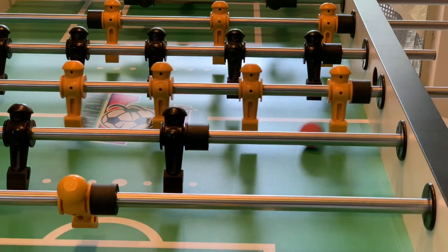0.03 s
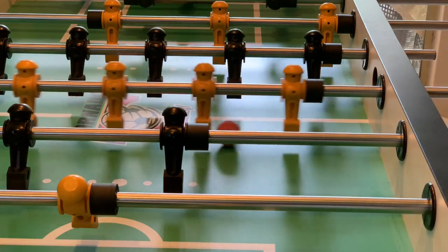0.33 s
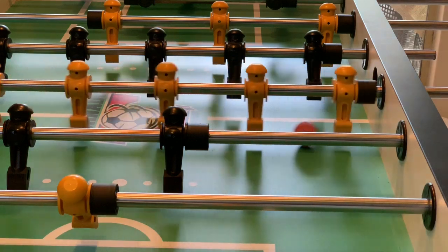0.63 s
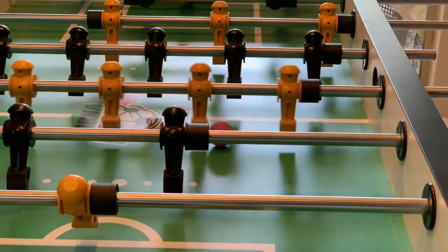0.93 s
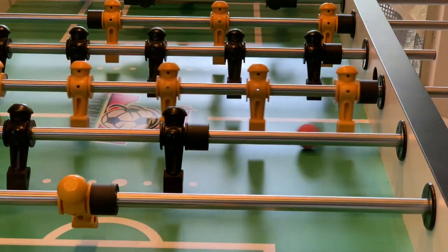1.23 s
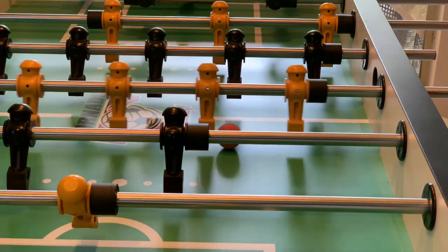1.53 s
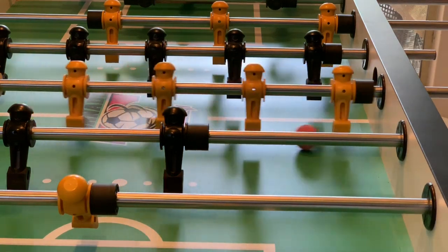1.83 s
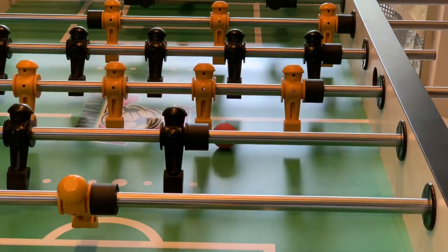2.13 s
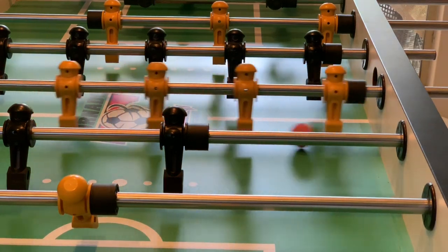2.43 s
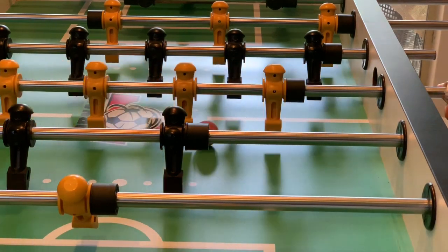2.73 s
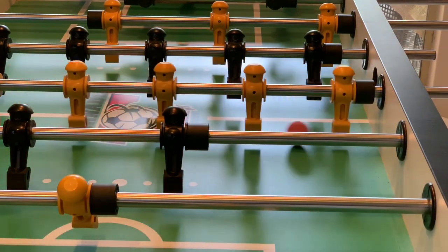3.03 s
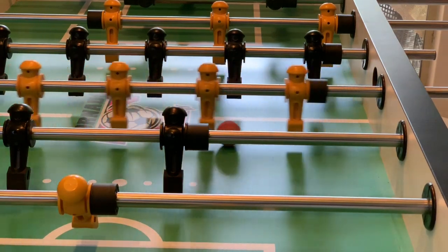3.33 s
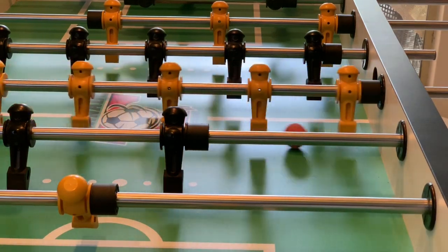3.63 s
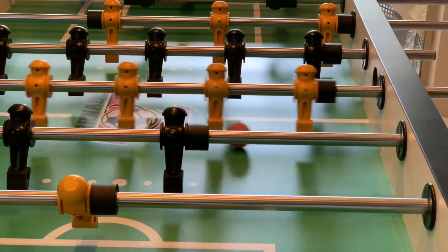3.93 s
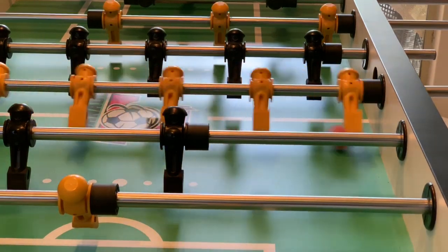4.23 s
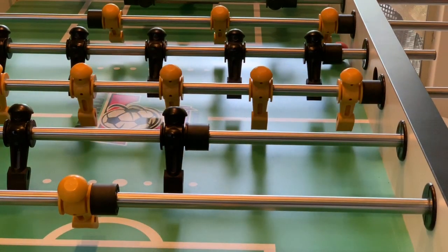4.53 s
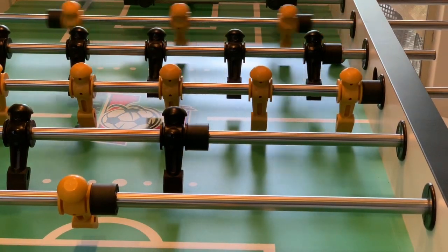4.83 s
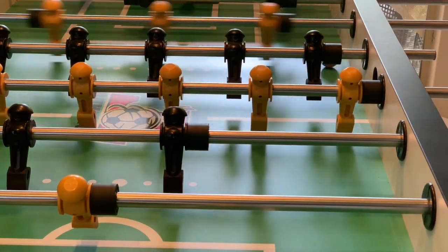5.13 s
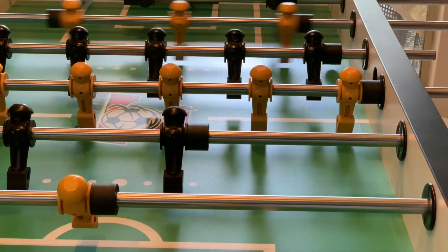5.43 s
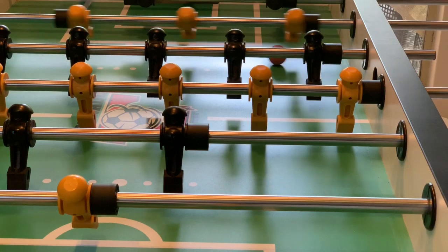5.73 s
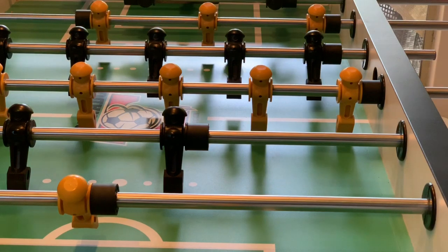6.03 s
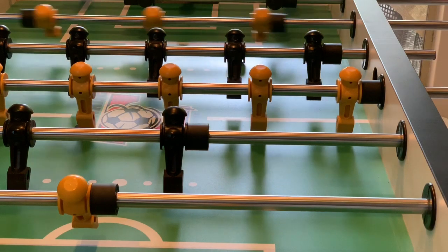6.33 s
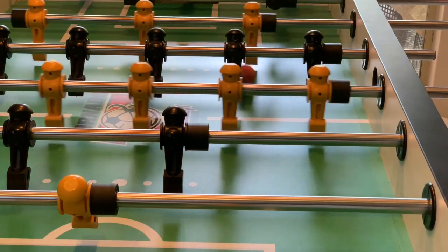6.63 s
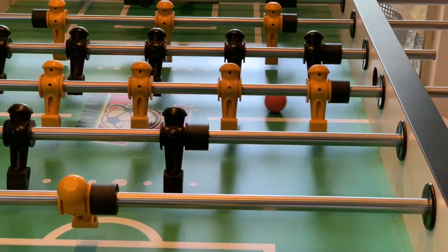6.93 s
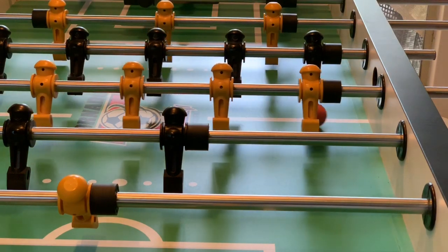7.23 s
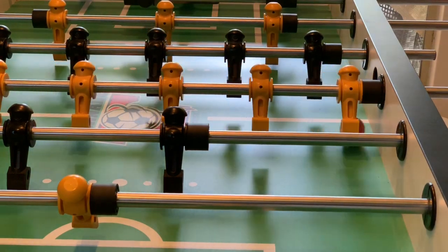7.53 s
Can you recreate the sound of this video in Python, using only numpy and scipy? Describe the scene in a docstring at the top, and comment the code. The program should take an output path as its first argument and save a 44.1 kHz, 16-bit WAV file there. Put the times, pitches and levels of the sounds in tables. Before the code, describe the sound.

A foosball table is heard from one end, in a quiet room with faint low background noise. For the first four seconds, plastic men tap the ball to and fro, seven light clicks about 0.6 seconds apart. After each, the ball hops, rolls with a soft rumble and is stopped with a small clunk, while a steel rod hisses back through its bearings. A dull thump comes near 2.5 seconds. At 4.3 seconds a hard shot booms through the cabinet, followed by sharp rebounds, with a loud knock at 4.5. Another crack comes at 5.1 and a cluster of knocks around 5.5. Quieter bounces, rod scrapes and clunks continue until a firmer knock and some rolling near 6.9 seconds. At about 7.6 seconds a last stroke gives a low thump with clicks and a clunk, and the ball rolls on.

```python
"""Table football in a quiet room.

Heard from one end of the table, two plastic men tap the ball to and fro; it hops and rolls, ringing the
playfield. Then come a shot, a rebound and bounces off the walls. The steel rods slide and clunk in
their bearings, and hard strokes make the cabinet boom."""
import sys
import numpy as np
from scipy import signal
from scipy.fft import rfft, irfft
from scipy.io import wavfile

SR = 44100
rng = np.random.default_rng(int(sys.argv[2]) if len(sys.argv) > 2 else 0)


def wav_out(sig):
    """Save sig, one row per channel (or a flat mono array), as 16-bit PCM at SR to the path in sys.argv[1]."""
    wavfile.write(sys.argv[1], SR, np.round(np.clip(np.atleast_2d(sig).T, -1, 1) * 32767).astype(np.int16))


N = 343539
SIZE = 24000  # samples per response
AGE_S = np.arange(SIZE) / SR
FREQ_HZ = np.maximum(np.arange(SIZE // 2 + 1) * SR / SIZE, 1)
ROOM_T60_S = 0.36

# a man taps the ball across: t/s, level/dB, flight/s, hiss of the rod's return/dB
TAPS = [(.178, -35, .030, -59), (.796, -33.5, 0.042, -57.5), (1.3991, -36, 0.034, -69.5),
        (1.992, -34.5, 0.033, -53.5), (2.538, -31.5, .035, -63), (3.210, -36, 0.028, -56),
        (3.837, -37.5, 0.026, -57)]
# the loose ball hits playfield or wall: t/s, level/dB, contact/ms, first hop/s
KNOCKS = [(2.497, -35, 0.52, 0), (4.379, -16, 0.56, 0), (4.392, -21.5, 1.7, .028), (4.448, -25, 0.82, 0),
          (4.499, -24.5, 0.55, 0), (4.518, -10.5, 0.44, 0), (5.1145, -23, 0.34, 0), (5.124, -16, 0.49, 0),
          (5.531, -23.5, 0.49, 0.0058), (5.596, -19.5, 0.56, 0), (5.642, -22, 0.78, .030),
          (5.930, -44, 0.93, 0), (6.009, -42.5, 1.12, 0.04), (6.157, -51.5, 1.25, 0), (6.189, -49, 1, 0),
          (6.250, -34.5, 0.89, 0), (6.430, -34.5, 1.93, 0), (6.566, -35.5, 1.12, 0),
          (6.858, -26, 0.83, 0.00071), (6.871, -21, 2.1, 0.0018)]
# a rod clunks in its bearings: t/s, level/dB, contact/ms
CLUNKS = [(2.448, -34.5, 0.1), (2.689, -35, 0.65), (4.939, -39.5, .11), (5.240, -37.5, .27),
          (5.454, -34.5, 0.16), (5.834, -36.5, 0.089), (6.232, -32, 0.24), (6.411, -39, 0.099),
          (6.502, -40, 0.074), (6.8576, -32.5, 0.19), (7.675, -33, .43)]
# stereo width of scattered sound: f/Hz, side over mid/dB
WIDTH = [(60, -24), (150, -18), (350, -11.5), (700, -5), (1400, -1), (4000, -0.5), (14000, -0.5)]


def from_db(db):
    """Decibels to gain."""
    return 10 ** (np.asarray(db) / 20)


def unit_energy(x):
    """Scale to a mean energy of one per channel."""
    return x / np.sqrt(np.mean(np.sum(x ** 2, axis=-1)))


def dying(t60_s, rise_s):
    """Envelope that swells, then falls 60 dB in t60_s."""
    return (1 - np.exp(-AGE_S / rise_s)) * np.exp(-np.log(1000) * AGE_S / t60_s)


def partials(modes, rise_s):
    """Sum of dying sines."""
    return sum(from_db(db) * np.sin(2 * np.pi * hz * AGE_S) * dying(t60_s, rise_s)
               for hz, db, t60_s in modes)


def gains(points):
    """Gain per bin from (f/Hz, level/dB) points."""
    hz, db = np.transpose(points)
    return from_db(np.interp(np.log(FREQ_HZ), np.log(hz), db))


def colour(points):
    """Minimum-phase response through (f/Hz, level/dB) points."""
    cepstrum = irfft(np.log(gains(points)))
    causal_fold = 1 + np.sign(SIZE / 2 - np.arange(SIZE)) * (AGE_S > 0)
    return np.exp(rfft(cepstrum * causal_fold))


def resonances(modes):
    """Ringing peaks on a flat response."""
    return 1 + sum(from_db(db) / (1 + 1j * (FREQ_HZ ** 2 - hz ** 2) / (FREQ_HZ * width_hz))
                   for hz, width_hz, db in modes)


def contact(ms, order):
    """Low-pass: a longer contact excites fewer highs."""
    corner_hz = min(1000 / max(ms, .06), .45 * SR)
    return signal.freqs(*signal.butter(order, 1, analog=True), FREQ_HZ / corner_hz)[1]


def scatter(t60_s, rise_s):
    """Stereo response of dense reflections."""
    mid, side = rfft(unit_energy(rng.standard_normal((2, SIZE)) * dying(t60_s, rise_s)))
    return mid + side * gains(WIDTH) * [[1], [-1]]


def reflections(blows, t60_s, rise_s, shared=.55):
    """One response per blow: the walls stay put, only the struck spot moves."""
    common = np.sqrt(shared) * scatter(t60_s, rise_s)
    return [common + np.sqrt(1 - shared) * scatter(t60_s, rise_s) for _ in blows]


def add(track, s, db, sound):
    """Mix in at time s, tail faded; db is the level if all the energy fell within 20 ms."""
    start = round(s * SR)
    fade = np.minimum(1, 4 * (1 - np.arange(SIZE) / SIZE))
    scaled = from_db(db) * np.sqrt(.02 * SR) * unit_energy(sound) * fade
    track[:, start:start + SIZE] += scaled[..., :N - start]


def steady(response, drive):
    """Two unrelated drives through a unit-energy response, as mid and side."""
    impulse = irfft(response)
    side_impulse = irfft(response * colour(WIDTH)) / np.linalg.norm(impulse)
    mid = signal.oaconvolve(drive[0], unit_energy(impulse))[:N]
    side = signal.oaconvolve(drive[1], side_impulse)[:N]
    return mid + side * [[1], [-1]]


def hops(s, db, ms, gap_s, loss_db, restitution=.6, shortest_s=.025):
    """Ever shorter, weaker bounces: t/s, level/dB, contact/ms."""
    contacts = [(s, db, ms)]
    while gap_s > shortest_s:
        s, db = s + gap_s, db - loss_db
        contacts.append((s, db, ms))
        gap_s *= restitution
    return contacts


def room_air(level_db=-62.5):
    """Faint, mostly low noise of the room."""
    spectrum = [(15, -48.5), (25, -16), (40, -3.5), (64, -0.5), (384, -26.5), (516, -30), (1700, -40),
                (9070, -49), (11300, -41.5), (12900, -44), (16000, -51)]  # room noise: f/Hz, level/dB
    return from_db(level_db) * steady(colour(spectrum), rng.standard_normal((2, N)))


def rolling(playfield, bumps_per_s=900, spread_db=1.3, gain_db=1.5):
    """Tiny bumps of the ball drum on the playfield, unevenly as it turns."""
    course = [(0.0, -49.5), (0.8, -46), (1.34, -50), (1.56, -45.5), (2.34, -46.5), (2.65, -45.5),
              (3.64, -49), (4.25, -47), (4.42, -29.5), (4.6, -55.5), (4.88, -57), (5.49, -48), (5.6, -42.5),
              (6.38, -54.5), (6.81, -39), (7.35, -67), (7.62, -65), (7.79, -42)]  # rumble over time: t/s, relative level/dB
    spectrum = [(25, -30), (60, -16.5), (75, 3), (105, 13.5), (140, 5), (190, -3.5), (280, -2),
                (550, -13.5), (800, -22), (1200, -26), (2200, -45), (5000, -51.5)]  # rumble: f/Hz, level/dB
    s, db = np.transpose(course)
    envelope = from_db(np.interp(np.arange(N) / SR, s, db) + gain_db)
    turn_db = spread_db * np.interp(np.arange(N), np.linspace(0, N, 200), rng.standard_normal(200))
    bumps = (rng.random((2, N)) < bumps_per_s / SR) * rng.standard_normal((2, N)) * from_db(turn_db)
    rumble = steady(playfield * colour(spectrum), bumps / bumps.std() * envelope)
    return rumble * from_db([[-.4], [.4]])


def rubbing(strokes, grit_db=2.5, snags_per_s=220):
    """Sliding steel catches unevenly; its noise swells and fades with each stroke's speed."""
    t = np.arange(N) / SR
    snags_s = np.arange(0, N / SR, 1 / snags_per_s)
    grit = from_db(grit_db * np.interp(t, snags_s, rng.standard_normal(len(snags_s))))
    envelope = sum(from_db(db) * np.exp(-((t - s) / half_s) ** 2) for s, half_s, db in strokes)
    return grit * envelope * rng.standard_normal((2, N))


def rod_slides(return_after_s=.394, return_half_s=.055):
    """A rod hisses back through its bearings after each tap; other strokes scrape more thinly."""
    strokes = [(.04, 0.076, -65.5), (4.28, 0.031, -51), (4.89, 0.072, -67.5), (5.1, 0.011, -49),
               (5.47, 0.03, -54.5), (5.80, 0.072, -62), (6.29, 0.067, -70.5), (6.45, 0.067, -65.5)]  # scraping strokes: middle/s, half length/s, level/dB
    hiss_spectrum = [(300, -8), (1000, 12), (1800, 11), (2700, -3.5), (4200, -7), (5500, -28), (7500, -27),
                     (9500, -19.5), (14000, -20.5)]  # returning rod: f/Hz, level/dB
    scrape_spectrum = [(300, 1.5), (1500, 8.5), (3500, -7), (5000, -17.5), (9500, -10.5), (14000, -10.5)]  # scraping rod: f/Hz, level/dB
    bearing_modes = [(3520, 250, -4), (6140, 350, 9), (8500, 390, 5.5)]  # bearing resonances: f/Hz, width/Hz, peak/dB
    returns = [(s + return_after_s, return_half_s, hiss_db) for s, _, _, hiss_db in TAPS]
    hiss = steady(colour(hiss_spectrum), rubbing(returns))
    scrape = steady(colour(scrape_spectrum) * resonances(bearing_modes), rubbing(strokes))
    return hiss + scrape


def cabinet_thumps(nudge_after_s=.007, nudge_db=-4, nudge_hz=84, falloff_db_per_oct=6.4):
    """Jolted, or nudged by a clunk, the heavy cabinet swings up over a few cycles and booms."""
    jolts = [(2.451, -24.5, 97), (4.301, -9.5, 100), (4.382, -22.5, 190), (4.521, -33, 197),
             (5.124, -30.5, 78.7), (5.438, -35.5, 79), (5.603, -28, 89), (6.567, -27, 161),
             (6.862, -24.5, 175), (7.618, -19.5, 98)]  # heavy jolts: t/s, level/dB, most shaken f/Hz
    modes = [(60.24, -12.5, 1), (88.2, -17, 0.9), (100, 5, 0.18), (122.6, -1, 0.15), (160.1, -1, 0.17),
             (212, -11, 0.48), (264.7, 2, 0.12), (314.2, -8, 0.29), (356.7, 6.5, 0.11)]  # cabinet modes: f/Hz, level/dB, t60/s
    nudges = [(s + nudge_after_s, db + nudge_db, nudge_hz) for s, db, _ in CLUNKS]
    out = np.zeros((2, N))
    for s, db, centre_hz in jolts + nudges:
        shaken = [(hz, mode_db - falloff_db_per_oct * abs(np.log2(hz / centre_hz)), t60_s)
                  for hz, mode_db, t60_s in modes]
        boom = rfft(partials(shaken, rise_s=.016))
        paths = 1 + from_db(-12) * scatter(t60_s=.35, rise_s=.015)
        add(out, s, db, irfft(boom * paths))
    return out * from_db([[-.6], [.6]])


def rod_clunks(rod_body, catches, slack_lead_s=.019, slack_db=-7, slack_ms=.4):
    """A rod is jarred by its own play, by slack before every second tap and by each ball it stops."""
    slack = [(s - slack_lead_s, db + slack_db, slack_ms) for s, db, _, _ in TAPS[1::2]]
    chatter = [hop for row in catches for hop in hops(*row, loss_db=2)]
    blows = CLUNKS + slack + chatter
    early = reflections(blows, t60_s=.11, rise_s=.0063)
    late = reflections(blows, ROOM_T60_S, rise_s=.018)
    out = np.zeros((2, N))
    for k, (s, db, ms) in enumerate(blows):
        paths = 1 + from_db(6) * early[k] + from_db(-1) * late[k]
        add(out, s, db, irfft(rod_body * contact(ms, order=3) * paths))
    return out


def tap_rings(foot_db=-12.5, spread_db=4, steel_db=-22.5):
    """The foot cracks on the ball, never twice alike; close partials of the rod beat as they fade."""
    foot_modes = [(2710, 11.5, 0.01), (3250, 9.5, 0.011), (3750, 0, .012)]  # a man's foot: f/Hz, level/dB, t60/s
    steel_modes = [(4170, 4, 0.18), (4120, 0.5, 0.27), (4240, 0, 0.25), (4530, -5, 0.2)]  # high rod partials: f/Hz, level/dB, t60/s
    steel = rfft(partials(steel_modes, rise_s=.001))
    out = np.zeros((2, N))
    for s, db, _, _ in TAPS:
        struck = [(hz, mode_db + rng.normal(0, spread_db), t60_s) for hz, mode_db, t60_s in foot_modes]
        add(out, s, db + foot_db, partials(struck, rise_s=.00042))
        paths = 1 + from_db(-1.5) * scatter(ROOM_T60_S, rise_s=.0054)
        add(out, s, db + steel_db, irfft(steel * paths))
    return out


def click_blows(crack_under_ms=.56, crack_db=-14.5):
    """Taps, shots and the briefest knocks all click; columns as in shots."""
    # hard blows of a man: t/s, click/dB, recoil/dB, direct sound/dB, treble/(dB/octave)
    shots = [(4.2965, -27, -23.5, 1.5, 2.5), (4.378, -17.5, -15.5, 8.5, -0.5), (5.103, -34, -26, 2.5, -3),
             (5.114, -19.5, -21.5, -13, 3), (5.469, -35, -29.5, -1.5, -5.5),
             (7.6103, -44.5, -31, -5.5, 2.5), (7.659, -41, -26.5, 4, 3)]
    taps = [(s, db, db + 8.5, -12.5, .34) for s, db, _, _ in TAPS]
    cracks = [(s - .001, db + crack_db, db + crack_db - 6.5, 0, 2)
              for s, db, ms, _ in KNOCKS if ms < crack_under_ms]
    return taps + shots + cracks


def plastic_clicks(rod_body, recoil_after_s=.002):
    """A sharp plastic click excites the room; the recoil of man and rod swells just after."""
    spectrum = [(100, -18), (600, 1), (1500, 11), (2500, -4), (3600, -3), (5000, -9.5), (7000, -17.5),
                (9500, -11), (14000, -21.5), (16000, -24)]  # click: f/Hz, level/dB
    man_modes = [(2078, 45, 8), (2354, 180, 6.5), (3120, 53, -2.5), (4380, 340, -6.5), (5730, 280, -8)]  # plastic man's resonances: f/Hz, width/Hz, peak/dB
    plastic = colour(spectrum) * resonances(man_modes)
    snap = resonances([(1830, 210, -3), (3500, 550, 2.5)])
    walls = contact(.22, order=2)  # the walls soak up the highs
    recoil = rod_body * contact(.23, order=2)
    blows = click_blows()
    early = reflections(blows, t60_s=.22, rise_s=.00088)
    late = reflections(blows, t60_s=.4, rise_s=.006)
    shudder = reflections(blows, t60_s=.27, rise_s=.0064)
    out = np.zeros((2, N))
    for k, (s, click_db, recoil_db, direct_db, treble_db_per_oct) in enumerate(blows):
        paths = from_db(direct_db) * snap + from_db(5) * early[k] + from_db(4) * walls * late[k]
        treble = colour([(3500, 0), (14000, 2 * treble_db_per_oct)])
        add(out, s, click_db, irfft(plastic * treble * paths))
        add(out, s + recoil_after_s, recoil_db, irfft(recoil * shudder[k]))
    return out


def ball_blows(catches):
    """The ball lands and skips after taps, drops after catches, runs loose: t/s, level/dB, contact/ms."""
    landings = [(s + flight_s, db + 9.5, .78) for s, db, flight_s, _ in TAPS]
    skips = [(s + flight_s + .023, db + 3, 1.1) for s, db, flight_s, _ in TAPS]
    drops = [(s + .017, db - 8, .95) for s, db, _, _ in catches]
    bounces = [hop for row in KNOCKS for hop in hops(*row, loss_db=6)]
    return landings + skips + drops + bounces


def ball_knocks(playfield, catches, room_at_1ms_db=-.5, room_db_per_halving=4):
    """The ball rings the board; the sound rattles between the table's walls, then dies in the room."""
    spectrum = [(40, -25), (100, -8.5), (300, -6), (600, -5.5), (1000, -1.5), (1600, -1), (2500, -3),
                (5000, -4.5)]  # struck board: f/Hz, level/dB
    board = playfield * colour(spectrum)
    blows = ball_blows(catches)
    early = reflections(blows, t60_s=.028, rise_s=.0012)
    late = reflections(blows, ROOM_T60_S, rise_s=.0031)
    out = np.zeros((2, N))
    for k, (s, db, ms) in enumerate(blows):
        room_db = room_at_1ms_db - room_db_per_halving * np.log2(ms)  # hard contacts wake the room more
        paths = 1 + from_db(4) * early[k] + from_db(room_db) * late[k]
        add(out, s, db, irfft(board * contact(ms, order=7) * paths))
    return out * from_db([[.75], [-.75]])


def scene():
    """Ball, rods and cabinet over the faint air of the room."""
    playfield_modes = [(155.6, 11, 16), (230.6, 25, 9), (265, 27, 6.5), (309.8, 11, 9.5), (354.7, 11, 13.5),
                       (387.8, 31, 11), (412, 12, 7.5), (462, 18, 10.5), (520.7, 13, 15),
                       (579.1, 20.8, 17.5), (664.4, 52, 14.5), (695.4, 31.2, 16.5), (782, 13, 8.5),
                       (848.5, 25, 14), (911, 27, 7.5), (1033, 15, 10), (1127, 7.4, 1), (1150, 66, 1),
                       (1185, 49, 7.5), (1348, 16, 4.5), (1324, 47, -5.5), (1467, 34, 7.5),
                       (1596, 130, 4.5), (1642, 30, 6), (1820, 52, 5), (1811, 10, 5.5), (1930, 11, 0.5),
                       (2166, 9, 4), (2145, 6.2, 3), (2325, 4.9, 9), (2700, 40, -1)]  # playfield resonances: f/Hz, width/Hz, peak/dB
    rod_modes = [(514, 150, -8), (2044, 65, 8.5), (3460, 360, -15.5), (4280, 220, 5.5)]  # rod bending modes: f/Hz, width/Hz, peak/dB
    rod_spectrum = [(40, -13), (110, 1.5), (250, 4.5), (450, 5.5), (750, -2), (1100, -4.5), (1600, -16.5),
                    (2200, -17.5), (3000, -20.5), (5000, -28), (12000, -23)]  # jarred rod: f/Hz, level/dB
    catches = [(.493, -31.5, 0.34, 0.061), (.999, -36.5, 0.45, .070), (1.650, -31.5, 0.45, .059),
               (2.206, -33, 0.63, 0.055), (2.858, -31, 0.28, 0.075), (3.453, -39, 0.7, 0.054),
               (4.096, -34.5, 0.62, 0.079)]  # a man stops the ball: t/s, level/dB, contact/ms, first hop/s
    playfield = resonances(playfield_modes)
    rod_body = playfield * resonances(rod_modes) * colour(rod_spectrum)
    rods = plastic_clicks(rod_body) + rod_clunks(rod_body, catches) + tap_rings() + rod_slides()
    rods *= from_db([[.2], [-.2]])
    return room_air() + rods + ball_knocks(playfield, catches) + cabinet_thumps() + rolling(playfield)


def record(dry, notch_hz=11320, notch_width_hz=2800, cutoff_hz=15300):
    """The microphone ports cancel a treble band; peaks clip at full scale and the top is cut."""
    notched = signal.lfilter(*signal.iirnotch(notch_hz, notch_hz / notch_width_hz, fs=SR), dry)
    lowpass = signal.ellip(10, .2, 80, cutoff_hz, fs=SR, output="sos")
    return signal.sosfilt(lowpass, np.clip(notched, -1, 1))


dry = scene()
out = record(dry)
wav_out(out)
```